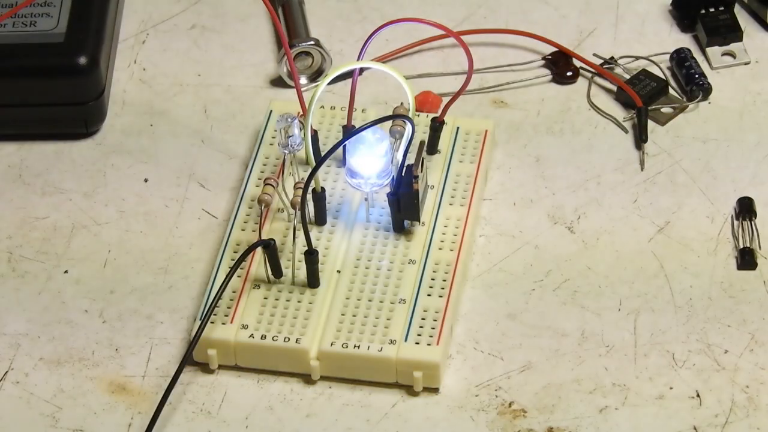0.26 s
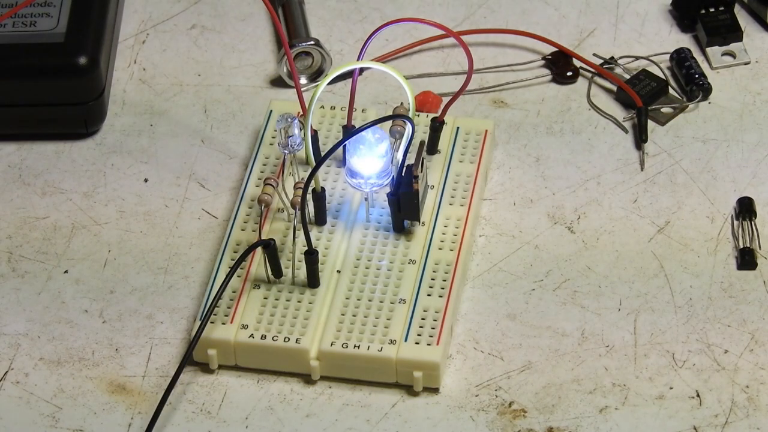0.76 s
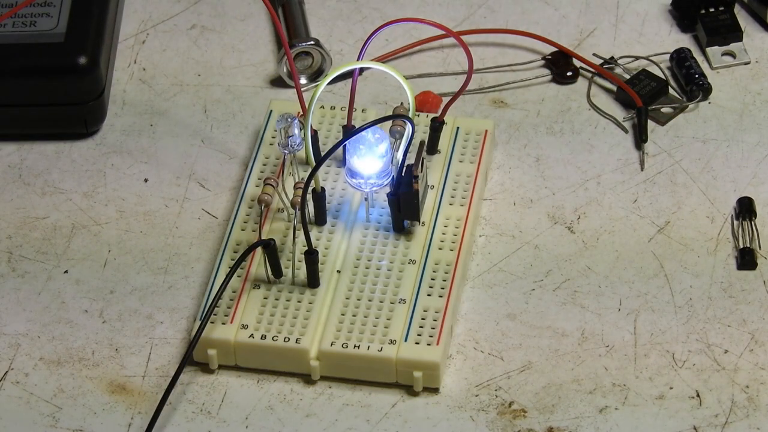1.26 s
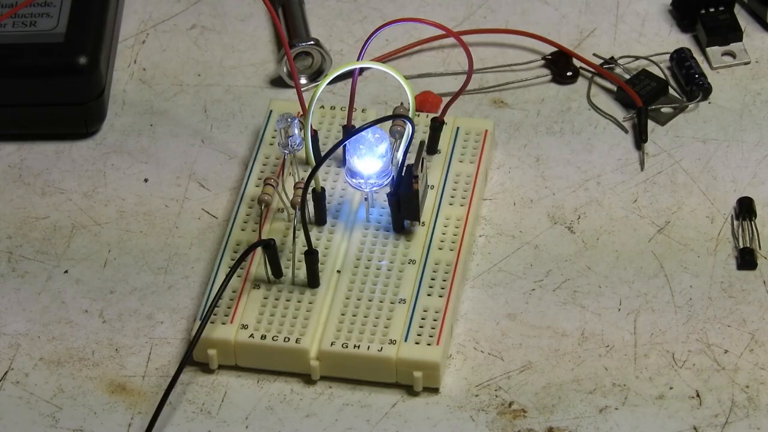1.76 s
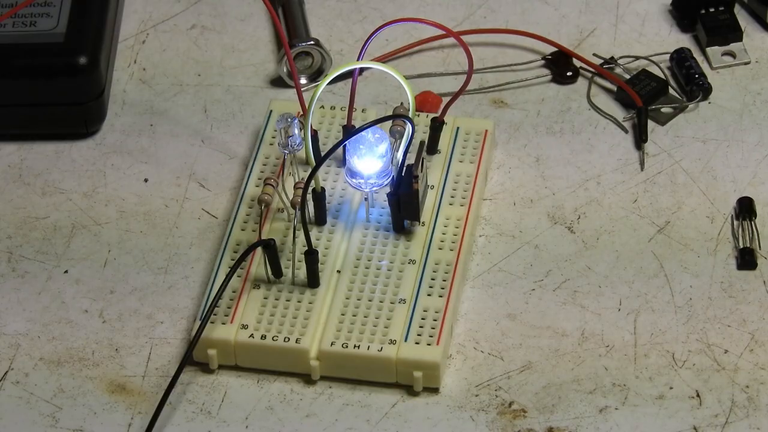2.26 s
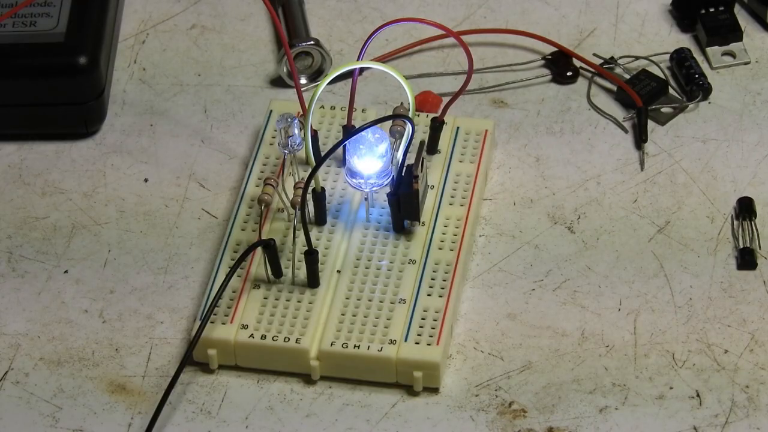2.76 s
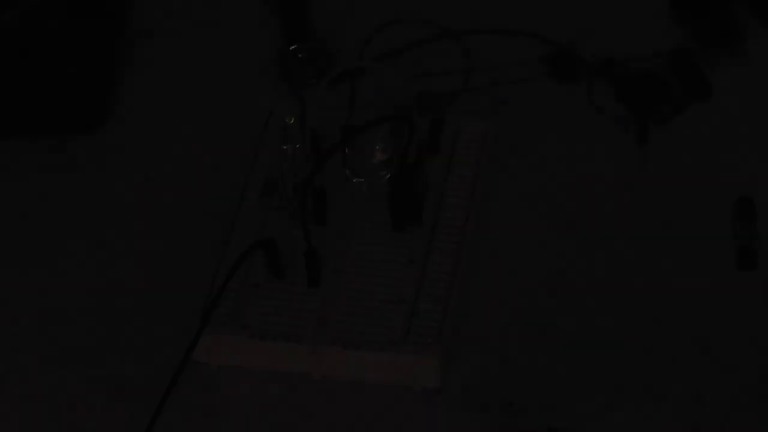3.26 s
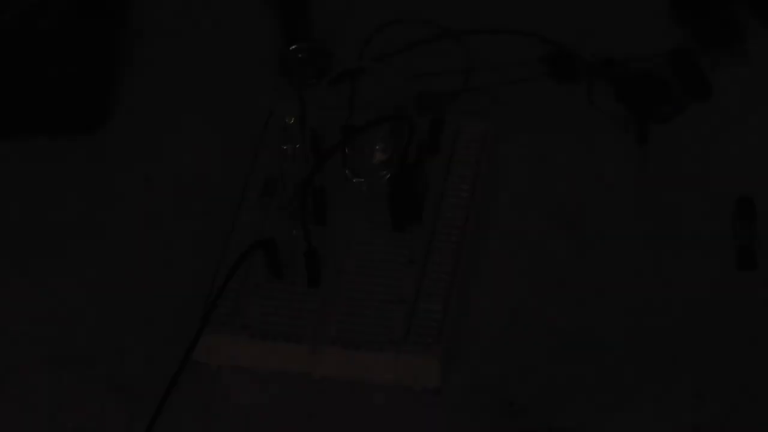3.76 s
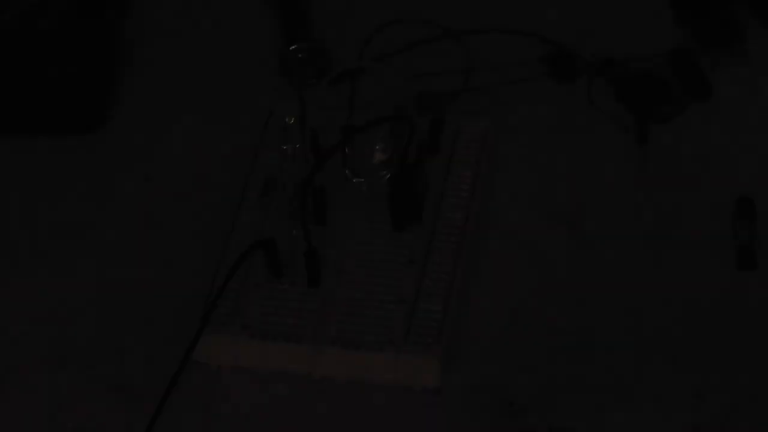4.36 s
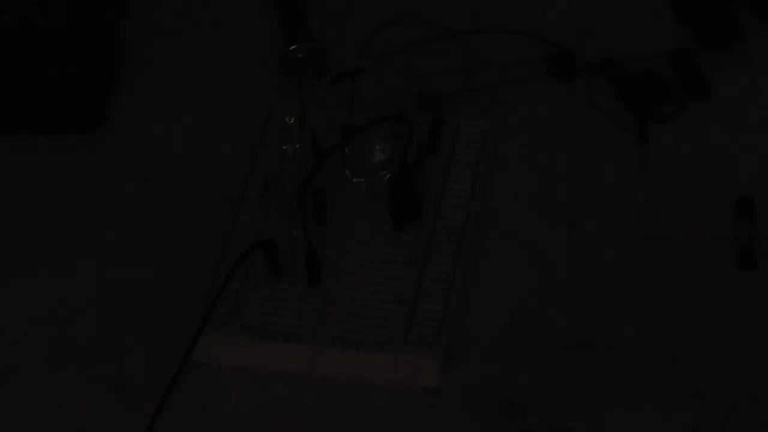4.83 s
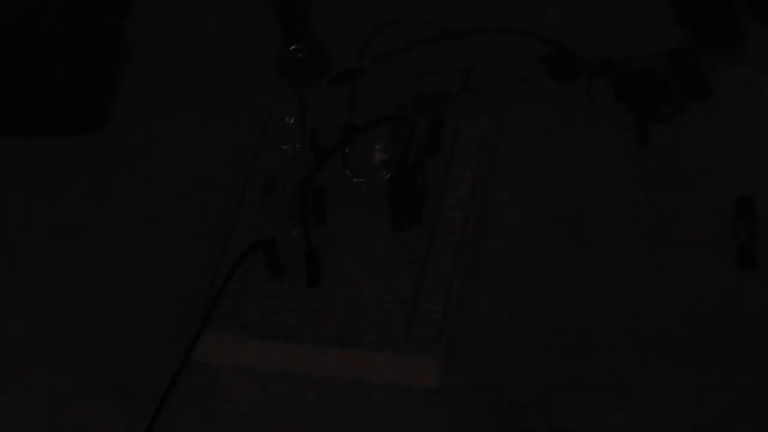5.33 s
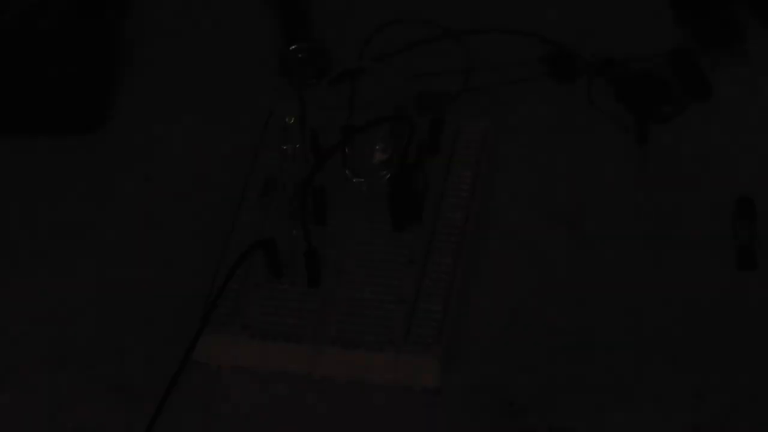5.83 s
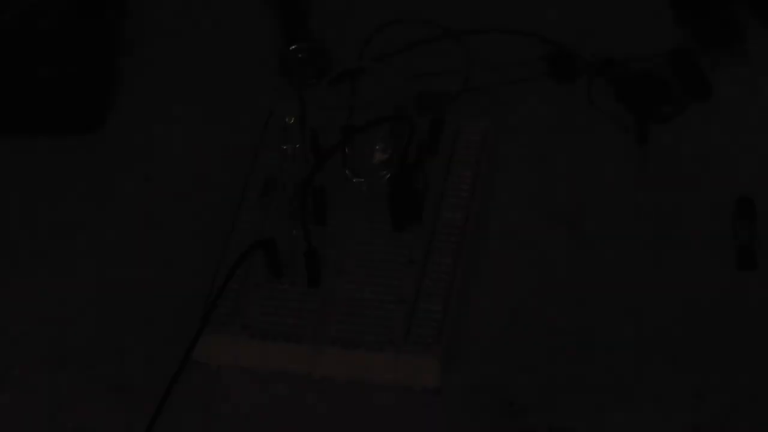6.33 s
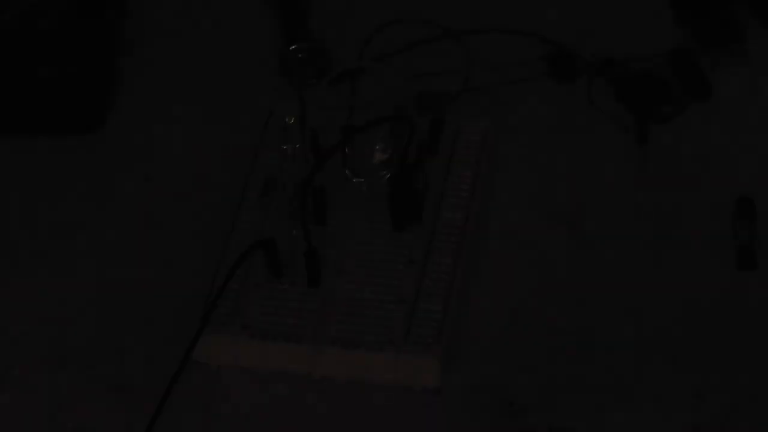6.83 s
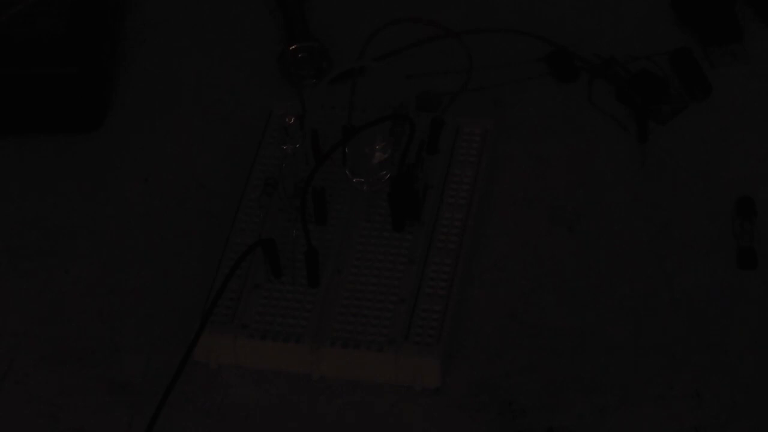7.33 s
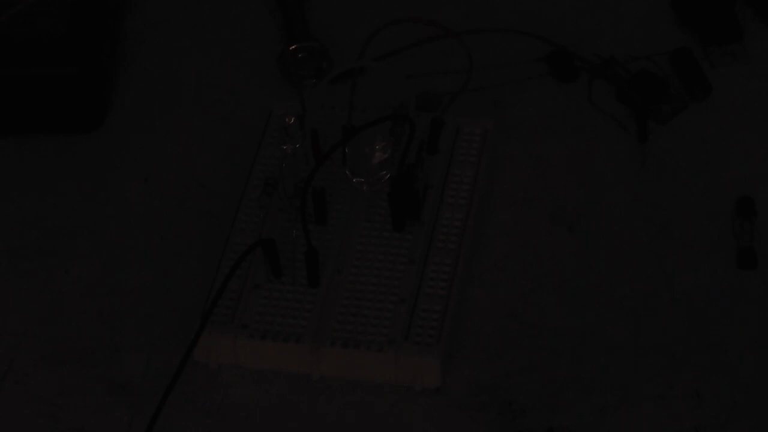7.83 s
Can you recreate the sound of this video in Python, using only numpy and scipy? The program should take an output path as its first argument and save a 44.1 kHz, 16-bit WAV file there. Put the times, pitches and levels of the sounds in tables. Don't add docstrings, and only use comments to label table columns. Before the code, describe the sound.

A quiet fan hums steadily with soft airflow and a faint wavering low whine in a small hard room. The tail of an earlier click fades at the start. Light finger ticks lead to a loud, bright wall switch snap near three seconds, then two more at about 4.6 and 6.3. Each rings briefly off the plate and room. The microphone turns itself down after each snap, and the fan creeps back up.

```python
import sys
import numpy as np
from scipy import signal
from scipy.fft import rfft, irfft, next_fast_len
from scipy.io import wavfile
from scipy.ndimage import uniform_filter1d

SR = 44100
rng = np.random.default_rng(int(sys.argv[2]) if len(sys.argv) > 2 else 0)


def pcm_store(signal):
    levels = np.round(np.clip(np.atleast_2d(signal), -1, 1) * 32767)
    wavfile.write(sys.argv[1], SR, levels.astype(np.int16).T)


def undo_db(level):
    steps = np.asarray(level, float) / 20
    return 10 ** steps


N = 356945
T = np.arange(N) / SR
SIZE = next_fast_len(N + SR)
HZ = np.arange(SIZE // 2 + 1) * SR / SIZE + 1e-3
TREBLE_LAG_S = 0.0092


def along(table, hz=HZ):
    points = np.array(table)
    return np.interp(np.log(hz), np.log(points[:, 0]), points[:, 1])


def shape(x, response):
    return irfft(rfft(x, SIZE) * response, SIZE)[..., :x.shape[-1]]


def ring(x, modes):
    return sum(undo_db(db) * signal.lfilter(*signal.iirpeak(hz, hz / width, SR), x) for hz, width, db in modes)


def unit(x):
    return x / np.sqrt(np.mean(x ** 2))


def walk(rate):
    k = int(SR / rate)
    steps = np.repeat(rng.standard_normal(N // k + 1), k)
    return unit(uniform_filter1d(uniform_filter1d(steps, k), k)[:N])


# frequency in Hz, likeness from 0 to 1.
ALIKE = [(60, 0.93), (130, 0.93), (260, 0.91), (540, 0.84), (1140, 0.82), (2370, 0.7), (4940, 0.4),
         (10300, 0.05)]


def diffuse(length):
    like = np.clip(along(ALIKE), 0, 1)
    mid, side = rng.standard_normal((2, length))
    mid = shape(mid, np.sqrt(1 + like))
    side = shape(side, np.sqrt(1 - like))
    return np.array([mid + side, mid - side]) / 2


# frequency in Hz, level in dB per Hz.
AIR_COLOUR = [(30, -12), (170, -12), (260, -22), (1100, -27.5), (2600, -36), (4500, -34.5), (9500, -42),
              (15500, -52.5)]
# frequency in Hz, width in Hz, rms level in dB.
FAN_HUMS = [(59.7, 3.9, -49), (115.3, 12, -53), (381.5, 15, -49), (430, 260, -50.5), (531.6, 61, -52.5),
            (720, 200, -59), (942, 150, -57), (1645, 80, -66.5), (1830, 300, -63.5)]
# frequency in Hz, left minus right in dB.
FAN_PAN = [(60, 3.5), (190, 3), (330, 5), (590, 2.5), (1050, 2.5), (1850, 2), (3280, 3), (10300, 0.85)]


def fan():
    air_db, flicker_db = -54, 2.0
    whine_hz, whine_db = 367.7, -42
    air = shape(diffuse(N), undo_db(along(AIR_COLOUR)))
    middle = shape(air.mean(axis=0), (HZ > 600) & (HZ < 4000))
    out = air * undo_db(air_db + 0.22 * walk(2.3)) / middle.std()
    for hz, width, db in FAN_HUMS:
        hum = unit(shape(diffuse(N), 1 / (1 + (2 * (HZ - hz) / width) ** 2)))
        out = out + undo_db(db + flicker_db * walk(12)) * hum
    turn = 2 * np.pi * np.cumsum(whine_hz + 2.5 * walk(10)) / SR
    out = out + undo_db(whine_db + 2.7 * walk(22)) * np.sqrt(2) * np.sin(turn)
    pan = along(FAN_PAN) / 2
    return np.array([shape(out[0], undo_db(pan)), shape(out[1], undo_db(-pan))])


# frequency in Hz, seconds to fall by 60 dB.
ROOM_DECAY = [(1000, 0.58), (2500, 0.34), (5000, 0.22), (8000, 0.17), (12000, 0.11)]


def room():
    t = np.arange(SR // 3) / SR
    bins_hz = np.arange(len(t) // 2 + 1) * 3 + 1e-3
    noise = rfft(rng.standard_normal((2, len(t))))
    noise[1] += (noise[0] - noise[1]) * np.clip(along(ALIKE, bins_hz), 0, 1)
    echo = 0
    for hz in 700 * 2 ** np.arange(0, 4.6, .5):
        band = irfft(noise * np.clip(1 - np.abs(2 * np.log2(bins_hz / hz)), 0, 1), len(t))
        echo = echo + band * undo_db(-60 * t / along(ROOM_DECAY, hz))
    echo = echo * np.clip(t / 0.0013, 0, 1)
    return echo / np.sqrt(np.mean(np.sum(echo ** 2, axis=1)))


DUCK_START_S = [-.035, 2.9408, 2.998, 4.475, 4.593, 6.2675]
DUCK_DEPTH_DB = [-9.5, -10.5, -19, -5.5, -11, -14]


def gain_db(t):
    fall_s, hold_s, recover_db_per_s = .002, 0.11, 8.5
    db = np.zeros_like(t)
    for s, low_db in zip(DUCK_START_S, DUCK_DEPTH_DB):
        target = np.minimum(low_db + recover_db_per_s * np.maximum(t - s - hold_s, 0), 0)
        db += (target - db) * np.clip((t - s) / fall_s, 0, 1)
    return db


# frequency in Hz, width in Hz, level in dB.
PLATE_MODES = [(4900, 290, -6.5), (5880, 420, -1), (7220, 240, -1), (7500, 470, 9.5), (8340, 330, 10.5),
               (8830, 710, 5.5)]
# frequency in Hz, width in Hz, level in dB.
PLATE_TOP_MODE = (12500, 4000, -4)


def click(event, body_modes, echo, rise_s=.001):
    s, peak_db, centre_hz, body_db, rattle_s, room_db = event
    tilt_db, leak_db, body_room_db = 16, -8, -10
    body_pan_db, plate_pan_db, left_lag_s = -6, 3, 3e-5
    mic_top_hz, top_hz = 9800, 15800
    t = np.arange(SR // 3) / SR
    chance = rng.random((3, len(t)))
    happens = chance[0] < 8000 / SR
    blows = happens * np.sign(chance[1] - .5) * undo_db(-2.0 * np.log(1 - chance[2]))
    blows[0] = 2

    bright = [(hz, width, db - tilt_db * np.log2(hz / centre_hz) ** 2)
              for hz, width, db in PLATE_MODES + [PLATE_TOP_MODE]]
    plate = ring(blows * np.exp(-t / max(rattle_s, .001)), bright)
    edge_hz = mic_top_hz if centre_hz < mic_top_hz else top_hz
    plate = signal.sosfilt(signal.cheby1(4, 2, edge_hz, fs=SR, output="sos"), plate)
    plate = plate + undo_db(leak_db) * ring(blows * np.exp(-t / 0.0046), [PLATE_TOP_MODE])
    plate = signal.sosfilt(signal.butter(3, 2600, "high", fs=SR, output="sos"), plate)

    push = blows * np.exp(-(t / .0115) ** 4) * np.clip(.1 + t / rise_s, 0, 1)
    body = 0
    for hz, width, db in body_modes:
        tone = ring(ring(push, [(hz, width, 0)]), [(hz, width, 0)])
        body = body + undo_db(db) * tone / tone[:SR // 80].std()
    body = signal.sosfilt(signal.butter(3, 600, "high", fs=SR, output="sos"), body)

    first = slice(0, SR // 125)
    plate *= undo_db(peak_db - gain_db(np.array(s + .004))) / plate[first].std()
    body *= undo_db(peak_db + body_db - gain_db(np.array(s - .006))) / body[first].std()

    side = np.array([[.5], [-.5]])
    direct = plate * undo_db(plate_pan_db * side) + body * undo_db(body_pan_db * side)
    bins_hz = np.arange(len(t) // 2 + 1) * 3
    direct[0] = irfft(rfft(direct[0]) * np.exp(-2j * np.pi * bins_hz * left_lag_s), len(t))
    source = plate + undo_db(body_room_db) * body
    return direct + undo_db(room_db) * signal.fftconvolve(source[None], echo, axes=1)[:, :len(t)]


# start in seconds, treble peak in dB, treble centre in Hz,
# body minus treble in dB, room level in dB.
SNAP_EVENTS = [
    (2.9398, -10.5, 8400, -9, -13.5),
    (4.593, -10, 8220, -11, -7),
    (6.2677, -10, 8060, -10.5, -11),
]
# frequency in Hz, width in Hz, level in dB.
SNAP_BODIES = [
    [(800, 150, -14), (1050, 180, -8), (1300, 150, -9), (1620, 180, -4), (2580, 300, 0), (3420, 200, -3)],
    [(820, 200, -16), (1220, 60, -15), (1650, 180, -10), (2250, 240, 0), (3460, 350, -5)],
    [(950, 250, -17), (1320, 170, -6), (2190, 170, 0), (2990, 150, -6), (3710, 300, 0)],
]
# start in seconds, treble peak in dB,
# treble centre in Hz, body minus treble in dB.
TICK_EVENTS = [(0.511, -70, 6000, 9), (.6729, -54, 12500, -9), (0.8568, -62.5, 5500, 8),
               (2.3570, -53.5, 4500, 4.5), (2.8143, -31.5, 5200, 1), (2.8814, -42, 7500, -8.5),
               (2.9974, -35.5, 5200, -24.5), (4.4747, -32.5, 7800, -12), (4.5396, -40.5, 6210, -22.5),
               (5.8596, -53, 4900, 10.5), (6.1010, -40.5, 4800, 3), (6.1988, -48.5, 9820, -17.5),
               (-.035, -24, 7870, 0.5)]
# frequency in Hz, width in Hz, level in dB.
TICK_BODY_MODES = [
    (2200, 2600, -4.5),
    (3400, 2700, -1.5),
]


def switch():
    snap_rattle_s, tick_rattle_s, tick_room_db = .0082, 0.0065, -1
    creak_lead_s, creak_rise_s = 0.013, 0.027
    light = (tick_rattle_s, tick_room_db)
    clicks = []
    for row, body in zip(SNAP_EVENTS, SNAP_BODIES):
        clicks.append((row[:4] + (snap_rattle_s, row[4]), body, .001))
    for row in TICK_EVENTS:
        clicks.append((row + light, TICK_BODY_MODES, .001))
    for row in SNAP_EVENTS:
        creak = (row[0] - creak_lead_s, -60.5, 7000, 20.5)
        clicks.append((creak + light, TICK_BODY_MODES, creak_rise_s))
    out = np.zeros((2, N + 2 * SR))
    for event, modes, rise_s in clicks:
        sound = click(event, modes, room(), rise_s)
        start = SR + round((event[0] - TREBLE_LAG_S) * SR)
        out[:, start:start + sound.shape[1]] += sound
    return out[:, SR:SR + N]


def scene():
    return switch() + fan()


# camera gain in dB, edge in Hz.
QUIET_EDGE = [(-20, 10300), (-14, 11100), (-10, 14300), (0, 15800)]
# start in seconds, treble edge in Hz.
CLICK_EDGES = [
    (2.816, 10900),
    (2.941, 11500),
    (4.475, 11300),
    (4.594, 11400),
    (6.268, 12600),
]


def lose_top(x):
    hz, t, cells = signal.stft(x, SR, nperseg=512)
    wander = 350 * walk(30)[np.minimum(t * SR, N - 1).astype(int)]
    edge_hz = np.interp(gain_db(t), *np.transpose(QUIET_EDGE)) + wander
    for s, tail_hz in CLICK_EDGES:
        edge_hz[(t > s + .012) & (t < s + .13)] = tail_hz
    return signal.istft(cells * (hz[:, None] < edge_hz), SR, nperseg=512)[1][:, :N]


def top_cut(x):
    return signal.sosfilt(signal.butter(12, 15800, fs=SR, output="sos"), x)


def record(dry):
    split_hz, look_ahead_s, offset = 3700, .003, -.0013
    blank_s, blank_snap_db, blank_tick_db = 0.013, -33, -8
    share = 1 / (1 + (split_hz / HZ) ** 24)
    treble = shape(dry, share * np.exp(-2j * np.pi * HZ * TREBLE_LAG_S))
    late = round(TREBLE_LAG_S * SR)
    treble[:, :late] = treble[:, 2 * late:late:-1]
    for s, _ in CLICK_EDGES:
        is_snap = min(abs(s - row[0]) for row in SNAP_EVENTS) < blank_s
        depth = undo_db(blank_snap_db if is_snap else blank_tick_db)
        treble = treble * np.clip(np.maximum(s - blank_s - T, T - s + .004) / .003, depth, 1)
    low = shape(dry, 1 - share) * undo_db(gain_db(T))
    x = lose_top(low + treble * undo_db(gain_db(T + look_ahead_s)))
    return top_cut(np.clip(x + offset, -1, 1))


dry = scene()
out = record(dry)
pcm_store(out)
```